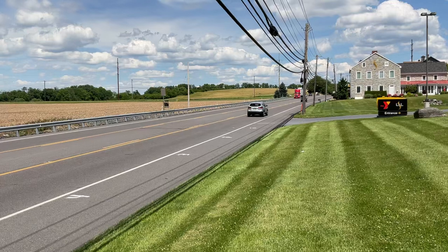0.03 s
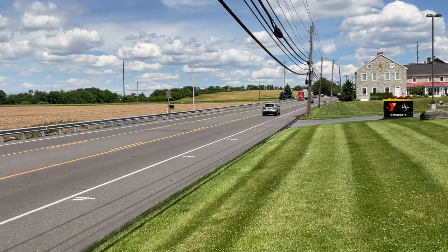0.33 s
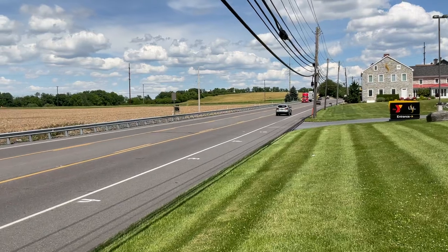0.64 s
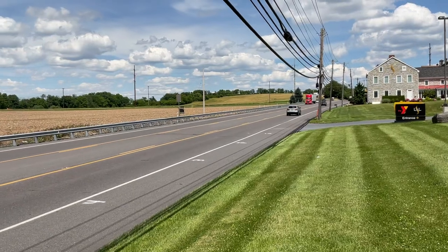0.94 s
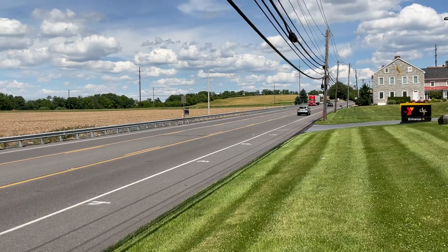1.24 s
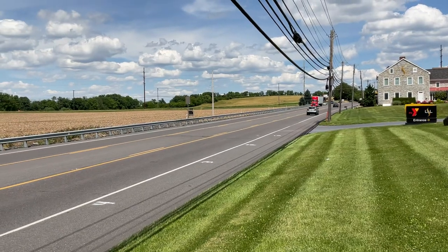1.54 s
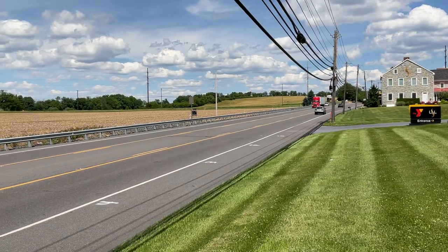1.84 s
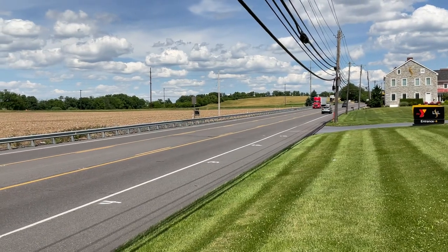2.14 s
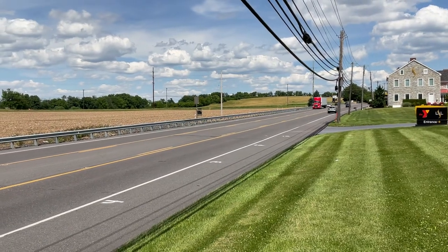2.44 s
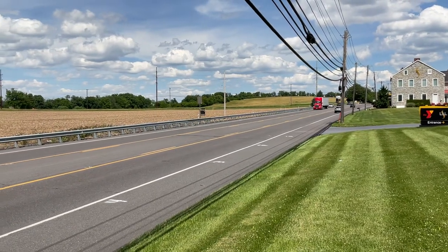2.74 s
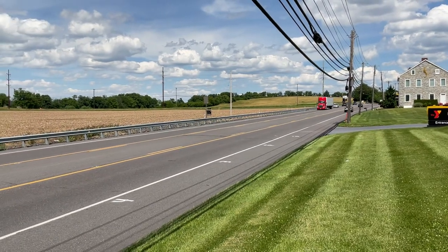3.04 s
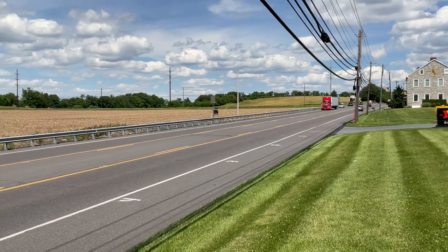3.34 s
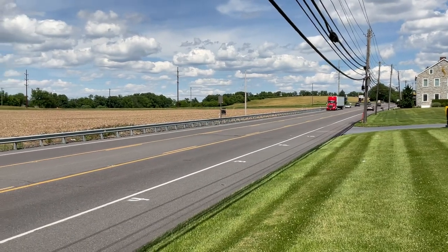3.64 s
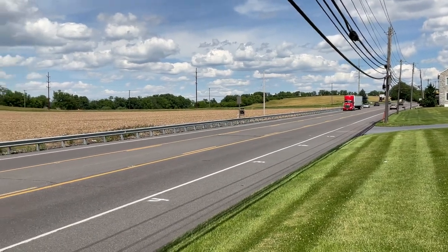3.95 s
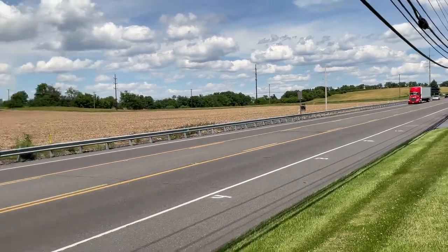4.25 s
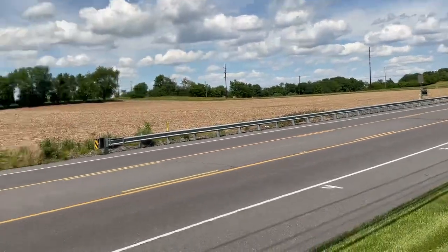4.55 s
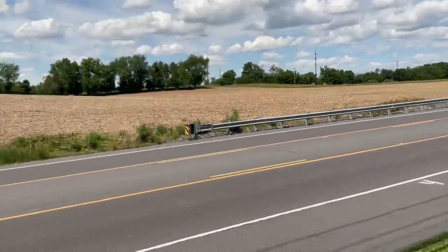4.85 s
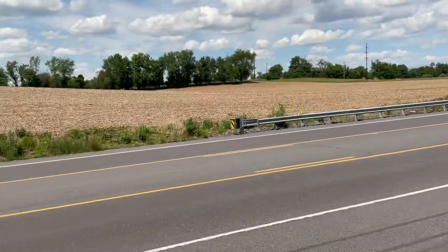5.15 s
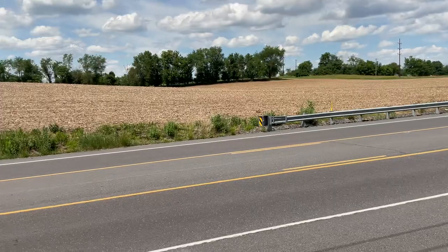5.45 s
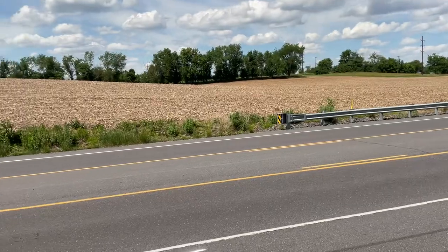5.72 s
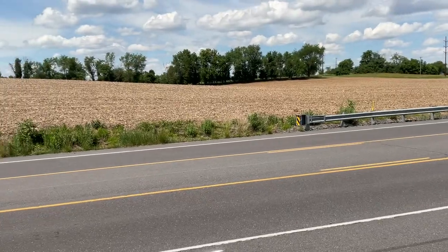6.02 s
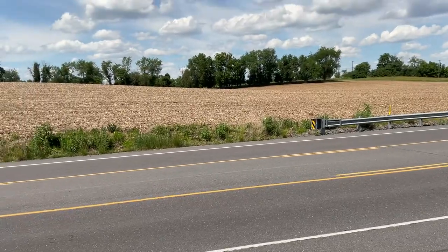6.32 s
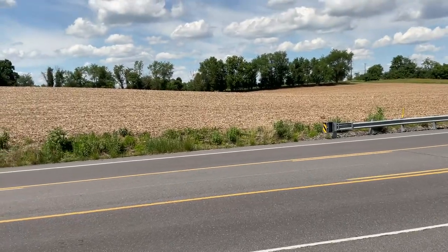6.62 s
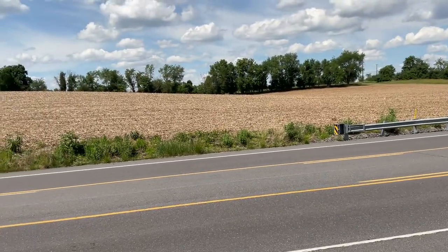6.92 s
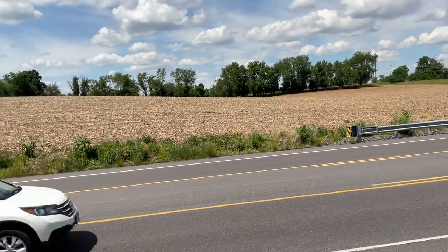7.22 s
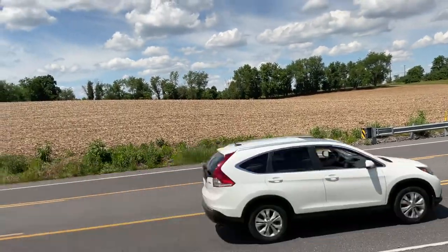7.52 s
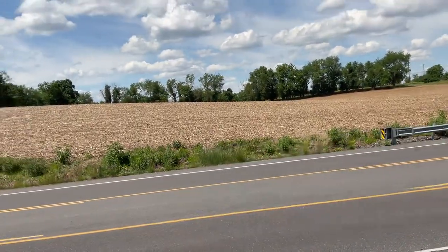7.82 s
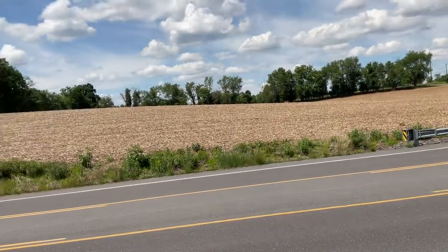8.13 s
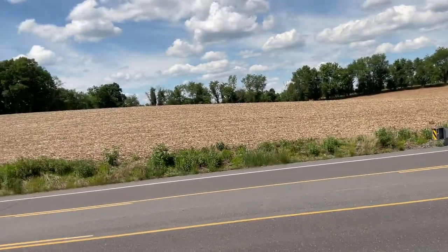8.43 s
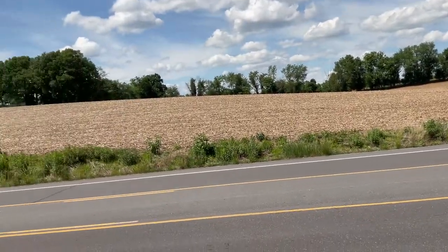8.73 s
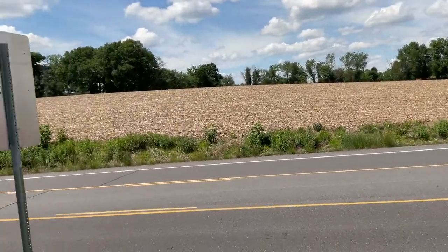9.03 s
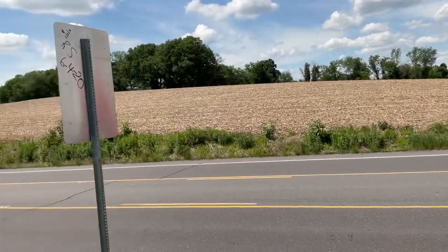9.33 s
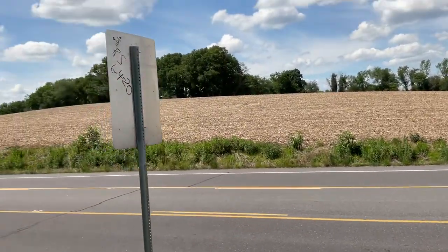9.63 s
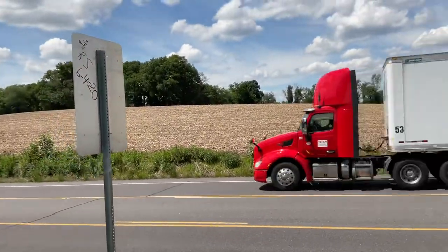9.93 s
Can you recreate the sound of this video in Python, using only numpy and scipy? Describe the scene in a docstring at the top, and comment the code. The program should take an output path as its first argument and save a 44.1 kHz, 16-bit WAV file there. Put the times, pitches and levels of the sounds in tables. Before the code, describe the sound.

A heavy truck comes up a rural road, its low diesel hum and faint turbo whistle giving way to growing tyre roar and whine. One car recedes at the start, and another rushes past close by just before the truck blares its air horn, short then long, on one note. The hand-held microphone at the roadside picks up a light wind rumble throughout and a few finger bumps and ticks midway.

```python
"""A heavy truck comes up a country road and sounds its air horn, short then long, as it draws level.
The horn is one note: a reed chopping air into a flared pipe, coloured by its echo off the road.
Under it the truck's tyres roar and whine, the diesel changes gear and the turbo whistles twice.
One car recedes and another passes close by. A light wind rumbles on the hand-held microphone,
and fingers bump and tick on its body."""
import sys
import numpy as np
from scipy import signal
from scipy.fft import rfft, irfft, next_fast_len
from scipy.io import wavfile

SR = 44100
rng = np.random.default_rng(int(sys.argv[2]) if len(sys.argv) > 2 else 0)


def materialize(psi):
    """Save the field psi as 16-bit PCM at rate SR to the path in sys.argv[1].

    A 1-D psi becomes a single channel; in a 2-D psi each row is a channel.
    """
    bounded = np.clip(np.atleast_2d(psi).T, -1, 1)
    quanta = np.round(bounded * 32767).astype(np.int16)
    wavfile.write(sys.argv[1], SR, quanta)


N = 439677
TIME = np.arange(N) / SR
FFT_SIZE = next_fast_len(N + 4096, True)
BIN_HZ = np.maximum(np.arange(FFT_SIZE // 2 + 1) * SR / FFT_SIZE, 1)


def from_db(db):
    """Decibels to gain."""
    return 10 ** (np.asarray(db) / 20)


def in_time(rows, t=TIME):
    """Read each automation lane of a table at the times t."""
    seconds, *columns = np.transpose(rows)
    return [np.interp(t, seconds, column) for column in columns]


def at_hz(rows, hz):
    """Read each column of a table along a log-frequency axis."""
    points, *columns = np.transpose(rows)
    return [np.interp(np.log(hz), np.log(points), column) for column in columns]


def bell(x, centre, width):
    """A smooth hump of height 1."""
    return np.exp(-((x - centre) / width) ** 2)


def glide(start, end, first_hz, last_hz, level_db):
    """Pitch and level of a tone that swells and fades while it slides."""
    done = np.clip((TIME - start) / (end - start), 0, 1)
    return first_hz + (last_hz - first_hz) * done, level_db + 20 * np.log10(np.sin(np.pi * done) + 1e-6)


def drift(rate_hz, t=TIME):
    """A smooth random modulator with spread 1."""
    pole = np.exp(-2 * np.pi * rate_hz / 1000)
    slow = signal.lfilter([1], [1, -2 * pole, pole * pole], rng.standard_normal(12000))[1500:]
    return np.interp(t * 1000, np.arange(len(slow)), slow / slow.std())


def fading(rate_hz, t=TIME):
    """Wandering strength and phase of many scattered paths; mean power 1."""
    return (drift(rate_hz, t) + 1j * drift(rate_hz, t)) / np.sqrt(2)


def place(mid, side, image, hz):
    """Mix two unrelated complex signals to stereo with the image's likeness, phase lead and balance."""
    alike, lead, balance_db = at_hz(image, hz)
    alike, tilt = np.clip(alike, 0, 1), from_db(balance_db / 2)
    mid, side = np.sqrt(1 + alike) * mid, np.sqrt(1 - alike) * side
    left, right = (mid + side) * tilt * np.exp(1j * lead), (mid - side) / tilt
    return np.array([left, right]) / np.sqrt(tilt ** 2 + tilt ** -2)


def roar(levels, eq, image, hiss_hz, flutter_db, low_cut_hz, grass=0, grass_hz=1100, air=0, air_hz=9500):
    """Tyre or wind noise fluttering in gusts; with distance, air can take its top and grass its body."""
    level_db, hiss_db = levels
    white = rfft(rng.standard_normal((2, FFT_SIZE))) * np.sqrt(SR / 2)
    spectrum = place(*white, image, BIN_HZ) * from_db(at_hz(eq, BIN_HZ)[0])
    spectrum /= np.sqrt(1 + (low_cut_hz / BIN_HZ) ** 8)
    high = 1 - 1 / (1 + (BIN_HZ / hiss_hz) ** 4)
    low = (1 - high) / (1 + (BIN_HZ / grass_hz) ** 8)
    highest = high / (1 + (air_hz / BIN_HZ) ** 12)
    bands = low, 1 - low - high, high - highest, highest
    body, middle, hiss, top = (irfft(spectrum * band, FFT_SIZE)[:, :N] for band in bands)
    far_db = np.minimum(hiss_db, 0)   # lost hiss stands for distance
    body = body * from_db(grass * far_db)
    hiss = hiss + top * from_db(air * far_db)
    return from_db(level_db + flutter_db * drift(3.3)) * (body + middle + hiss * from_db(hiss_db))


def hum(controls, harmonics, image, rough, width_hz):
    """Harmonics of something that turns; scattered paths smear the share `rough` of each."""
    hz, level_db = controls
    phase = 2 * np.pi * np.cumsum(hz) / SR
    out = 0
    for k, harmonic_db in harmonics:
        tone = np.sqrt(1 - rough) + np.sqrt(rough) * fading(width_hz)
        pair = place(tone, fading(width_hz), image, k * np.median(hz))
        out += from_db(harmonic_db) * (pair * np.exp(1j * k * phase)).real
    return np.sqrt(2) * from_db(level_db) * out


# The rumble's fader moves. Each row: time in seconds, level in dB, hiss gain in dB.
RUMBLE_LEVELS = [(0, -59, -12), (2.5, -60.5, 6), (4, -56.5, 13.5), (6.2, -54, 3), (7.1, -51, 16),
                 (9.97, -49, 12)]
# Its EQ. Each row: frequency in Hz, gain in dB.
RUMBLE_EQ = [(18, -34), (30, -25), (50, -3), (65, 1.5), (90, -2), (125, -0.5), (170, -10), (250, -19.5),
             (500, -41), (2000, -90)]
# Its stereo image. Each row: frequency in Hz, likeness 0-1, left lead in radians, left over right in dB.
RUMBLE_STEREO = [(40, .985, 0, -.3), (100, .98, .05, -.8), (220, .95, .1, -2)]


def wind_rumble():
    """Light wind on the microphone, blended with engine rumble into one low bed."""
    return roar(in_time(RUMBLE_LEVELS), RUMBLE_EQ, RUMBLE_STEREO,
                hiss_hz=395, flutter_db=1.37, low_cut_hz=22)


# Soft bumps. Each row: start in seconds, level in dB, ring in Hz, seconds to fall 60 dB.
FINGER_BUMPS = [(3.244, -17.5, 183, 0.044), (3.274, -18.5, 90, 0.043), (3.745, -24.5, 262, 0.025),
                (4.079, -27, 200, 0.037), (4.161, -27, 262, 0.037), (4.455, -21, 171.5, 0.026),
                (5.446, -23.5, 130, 0.13)]
# Small ticks. Each row: start in seconds, level in dB, decay in seconds.
FINGER_TICKS = [(4.1455, -37, 0.0034), (4.1517, -42, 0.0026), (4.1556, -27.5, 0.0028), (4.1625, -44, .001)]
# The ticks' EQ. Each row: frequency in Hz, gain in dB.
TICK_EQ = [(200, -7), (800, 7), (1700, 3), (3000, -14), (8500, -19.5), (11000, -32), (16000, -48)]


def handling():
    """Fingers on the microphone's body: damped low rings and tiny bursts of noise."""
    bumps, ticks = np.zeros(N), np.zeros(N)
    for start, level_db, hz, t60 in FINGER_BUMPS:
        age = TIME[:N - round(start * SR)]
        envelope = from_db(level_db - 60 * np.minimum(age / t60, 4)) * (1 - np.exp(-age / 0.0013))
        bumps[-len(age):] += envelope * np.sin(2 * np.pi * hz * age)
    for start, level_db, decay in FINGER_TICKS:
        age = TIME[:N - round(start * SR)]
        envelope = from_db(level_db) * np.exp(-np.minimum(age / decay, 20))
        ticks[-len(age):] += envelope * rng.standard_normal(len(age))
    eq = from_db(at_hz(TICK_EQ, BIN_HZ)[0])
    eq /= np.sqrt(np.mean(eq ** 2))
    return bumps + irfft(rfft(ticks, FFT_SIZE) * eq, FFT_SIZE)[:N]


def drive_by(loudest_s, half_s, level_db, fall_db, hiss_db, hiss_fall_db, hiss_lag_s):
    """A car's level and hiss fall per decade of distance; hiss is thrown backwards, so it peaks later."""
    decades = np.log10(np.hypot(1, (TIME - loudest_s) / half_s))
    hiss_decades = np.log10(np.hypot(1, (TIME - loudest_s - hiss_lag_s) / half_s))
    return level_db - fall_db * decades, hiss_db - hiss_fall_db * hiss_decades


# The receding car's EQ. Each row: frequency in Hz, gain in dB.
LEAVING_EQ = [(150, -7), (400, -13), (560, -8.5), (800, -1.5), (1150, -1), (1600, -5), (2100, -16),
              (2800, -22.5), (3800, -27.5), (6000, -38), (9000, -51.5), (14000, -93)]
# Its stereo image. Each row: frequency in Hz, likeness 0-1, left lead in radians, left over right in dB.
LEAVING_STEREO = [(120, 1, 3.5, -16), (420, 0.97, 1.67, 1.5), (730, 0.52, 3, 4.5), (1145, 1, 0.25, 0.5),
                  (1690, 0.35, -0.4, -0.5), (2600, 1, 0, 0), (7000, 0.87, 0, -2)]


def leaving_car():
    """Tyre roar of a car already past, fading and dulling as it recedes."""
    levels = drive_by(loudest_s=-2.5, half_s=0.28, level_db=-51, fall_db=15.5,
                      hiss_db=16, hiss_fall_db=11.5, hiss_lag_s=0.25)
    return roar(levels, LEAVING_EQ, LEAVING_STEREO, hiss_hz=1550, flutter_db=0.85, low_cut_hz=110)


# The close car's EQ. Each row: frequency in Hz, gain in dB.
PASSING_EQ = [(150, -16), (400, -22), (750, 0.5), (1100, 0.5), (1650, -2.5), (2100, -13), (2800, -19.5),
              (3800, -25), (6000, -26), (8700, -35), (11500, -40.5), (16000, -53)]
# Its stereo image. Each row: frequency in Hz, likeness 0-1, left lead in radians, left over right in dB.
PASSING_STEREO = [(202, 0.99, -6.5, -11), (398, 0.49, 4, 6), (680, 1, 3.5, 8), (1010, 0.27, 3.5, 14.5),
                  (1560, 1, 1.5, 4), (2290, 0.12, 3, 3.5), (3470, 0.73, -1, -3.5), (7140, 0.99, 0, 0.5)]


def passing_car(opens_s=5.73, opening_s=0.046):
    """Tyre roar of a close pass-by, muffled until the car comes into the open."""
    level_db, hiss_db = drive_by(loudest_s=7, half_s=1.13, level_db=-54.5, fall_db=42,
                                 hiss_db=2, hiss_fall_db=32, hiss_lag_s=0.88)
    muffled = 0.5 - 0.5 * np.tanh((TIME - opens_s) / opening_s)
    levels = level_db - 2 * muffled, hiss_db - 5.5 * muffled
    return roar(levels, PASSING_EQ, PASSING_STEREO, hiss_hz=3160, flutter_db=0.84, low_cut_hz=100,
                grass=0.83, grass_hz=1080, air=4.9)


TRUCK_M_PER_S, ALONGSIDE_S, LANE_M, SOUND_M_PER_S = 20, 9.85, 9, 343


def truck_distance(t=TIME):
    """Metres from the truck to the microphone."""
    return np.hypot(LANE_M, TRUCK_M_PER_S * (ALONGSIDE_S - t))


# Fader moves of the truck's tyre roar. Each row: time in seconds, level in dB, hiss gain in dB.
TRUCK_LEVELS = [(0, -110, -13), (5, -84, -3.5), (7, -64.5, -30), (8, -58.5, -2), (8.7, -62.5, 4),
                (9.15, -62.5, -2.5), (9.5, -60, -6), (9.97, -61, -5)]
# Its EQ. Each row: frequency in Hz, gain in dB.
TRUCK_EQ = [(150, 2.5), (400, -1.5), (750, 2.5), (1100, -2.5), (1600, -4), (2100, -7.5), (2800, -10),
            (3800, -14), (6000, -22.5), (9000, -30), (12000, -38.5), (16000, -51)]
# Its stereo image. Each row: frequency in Hz, likeness 0-1, left lead in radians, left over right in dB.
TRUCK_STEREO = [(198, 1, 0, 0.5), (473, 1, -1.13, -5), (734, 1, 2.5, -4.5), (1030, 0.34, 0.3, -6),
                (1550, 0.31, 0, -3.5), (2440, 0.95, -0.54, -0.5), (7000, 0.99, 0.5, -2)]


def truck_tyres():
    """The broad roar of heavy tyres, building as the truck comes up."""
    return roar(in_time(TRUCK_LEVELS), TRUCK_EQ, TRUCK_STEREO,
                hiss_hz=2520, flutter_db=0.65, low_cut_hz=90)


# The whine's pitch curve. Each row: time in seconds, tread block rate in Hz.
TREAD_PITCH = [(0, 297), (5, 297.1), (5.7, 293.5), (6.9, 283.8), (8.5, 284.7), (9.15, 280.4), (9.72, 273.2),
               (9.97, 273.4)]
# Its timbre. Each row: harmonic number, gain in dB.
TREAD_HARMONICS = [(1, -12), (2, 2.5), (3, -14), (4, -10.5)]
# Brief drones at its fundamental. Each row: start and end in seconds, first and last Hz, level in dB.
TREAD_DRONES = [(5.152, 5.78, 298, 290, -46), (6.2, 6.7, 292, 288, -44.5)]


def tread_whine():
    """Tread blocks strike the road in a whine that grows with nearness and swells once on the way."""
    metres = truck_distance()
    fall_db = 3.5 * np.log10(metres / LANE_M) + 0.27 * (metres - LANE_M)
    level_db = -23.8 - fall_db + 3 * bell(TIME, centre=6.15, width=0.36)
    hz = in_time(TREAD_PITCH)[0]
    whine = hum((hz, level_db), TREAD_HARMONICS, TRUCK_STEREO, rough=0.81, width_hz=17.1)
    return whine + sum(hum(glide(*drone), [(1, 0)], TRUCK_STEREO, rough=0.4, width_hz=4)
                       for drone in TREAD_DRONES)


# The diesel's revs. Each row: time in seconds, firing rate in Hz, level in dB.
DIESEL_REVS = [(0, 95.9, -43), (2, 99.16, -42.5), (2.6, 99.5, -38), (3.45, 99.2, -42), (3.6, 86, -39),
               (5.3, 82.7, -40.5), (5.9, 82.6, -39.5), (6.3, 80.8, -48), (9.97, 76, -62)]
# Its timbre. Each row: harmonic number, gain in dB.
DIESEL_HARMONICS = [(1, 2), (2, -12), (3, -22.5)]


def diesel_exhaust():
    """The exhaust hums at the firing rate, which drops at the gear change."""
    return hum(in_time(DIESEL_REVS), DIESEL_HARMONICS, RUMBLE_STEREO, rough=0.13, width_hz=2.8)


# Two rising whistles. Each row: start and end in seconds, first and last Hz, level in dB.
TURBO_SWELLS = [(3.419, 4.084, 1407, 1502, -44), (4.123, 4.35, 1549, 1585, -47.5)]


def turbo_whistle():
    """A thin whistle, as of a turbo spooling up."""
    return sum(hum(glide(*swell), [(1, 0)], TRUCK_STEREO, rough=0.21, width_hz=17)
               for swell in TURBO_SWELLS)


def field_echoes(dry, level_db, t60, dull_hz):
    """A thin, dull reverb tail from the guard rail, a house and trees."""
    t = TIME[:SR]
    tail = rng.standard_normal((2, SR)) * from_db(-60 * t / t60) * (t > 0.02)
    tail /= np.sqrt(np.sum(tail ** 2, axis=1, keepdims=True))
    tail = signal.sosfilt(signal.butter(1, dull_hz, fs=SR, output="sos"), tail)
    return from_db(level_db) * signal.fftconvolve(dry, tail, axes=1)[:, :N]


# The horn's wavering level. Each row: time in seconds, gain in dB at full depth.
HORN_WAVER = [(7.42, 0), (7.6, -1), (7.72, 0.5), (8, 5.5), (8.2, -4), (8.43, 0.5), (8.75, 1.5),
              (8.92, -1.5)]
# How harmonics follow waver and approach. Each row: harmonic number, waver depth, exponent of nearness.
HORN_RESPONSE = [(1, 0.84, 1.25), (1.98, 0.05, 0.35), (4.05, 0.12, 0.15), (5.05, 0.34, 0.43),
                 (7, 0.21, 1.6), (12.1, 0.58, 0.98), (23.6, 1.15, 1.32)]


def horn_path(t, hz, k, horn_height_m=4.1, mic_height_m=1.6, reference_m=30, echo_cutoff_hz=507):
    """Gain of harmonic k: it nears and wavers; the road echo cancels the fundamental at one distance."""
    metres = truck_distance(t)
    bounced_m = np.hypot(metres, horn_height_m + mic_height_m)
    direct_m = np.hypot(metres, horn_height_m - mic_height_m)
    reflection = 0.99 / (1 + (k * hz / echo_cutoff_hz) ** 8)
    echo = reflection * np.exp(-2j * np.pi * k * hz * (bounced_m - direct_m) / SOUND_M_PER_S)
    waver_depth, nearness = at_hz(HORN_RESPONSE, k)
    waver_db = waver_depth * in_time(HORN_WAVER, t)[0]
    # the upper mids blare late in the long blast
    blare_db = 7.5 * bell(t, centre=8.8, width=0.14) * bell(np.log2(k * hz / 1730), centre=0, width=0.26)
    return (1 + echo) * (reference_m / metres) ** nearness * from_db(waver_db + blare_db)


# The horn's timbre. Each row: harmonic number, level in dB.
HORN_HARMONICS = [(1, -19), (2, -24.5), (3, -27.5), (4, -29.5), (5, -23.5), (6, -31), (7, -26.5), (8, -29),
                  (10, -32.5), (12, -36.5), (15, -36.5), (19, -43), (23, -41.5), (33, -51.5), (40, -60),
                  (52, -71.5)]
# Its stereo image. Each row: frequency in Hz, likeness 0-1, left lead in radians, left over right in dB.
HORN_STEREO = [(300, 0.95, -0.6, -1), (583, 1, -0.68, -1.5), (890, 0.56, 0.98, -0.5),
               (1150, 0.87, -0.32, -3.5), (1470, 1, -0.12, -14), (1740, 0.9, -0.18, 0),
               (2500, 0.95, -0.32, 1), (4750, 1, -0.18, -5), (7000, 0.72, 0.44, -4), (9100, 1, 0.22, 0)]
# The short and the long blast. Each row: valve opening and closing in seconds, gain in dB.
HORN_BLASTS = [(7.36, 7.74, 0.5), (7.91, 8.94, 1.42)]
REED_HZ, START_SHARP_HZ, SETTLE_S, SAG_HZ_PER_S, RELEASE_HZ_PER_S = 280.1, 4.58, 0.044, 1.7, 100
ATTACK_S, DRAIN_DB_PER_OCTAVE_S, STALL_S = 0.015, 64, 0.053


def air_horn(opens, closes, blast_db, darkening=0.57, jitter_hz=0.4, rasp=0.1, rasp_hz=84,
             scatter_low=0.0092, scatter_high=0.99, kinship=0.49, fade_hz=9.9):
    """A reed chops air into a flared pipe: the harder it is blown, the further up its harmonics reach."""
    sounding = (TIME > opens) & (TIME < closes + 4 * STALL_S)
    t, out = TIME[sounding], np.zeros((2, N))
    age, shut_s = t - opens, np.maximum(t - closes, 0)
    # the reed starts sharp, settles, sags as the tank empties and goes sharp once the valve closes
    reed_hz = REED_HZ + START_SHARP_HZ * np.exp(-age / SETTLE_S) - SAG_HZ_PER_S * age
    reed_hz += RELEASE_HZ_PER_S * shut_s
    hz = reed_hz / (1 + np.gradient(truck_distance(t), t) / SOUND_M_PER_S)   # Doppler shift
    phase = 2 * np.pi * np.cumsum(hz + jitter_hz * drift(25, t)) / SR
    # the tone builds from the bottom up; on release the overtones drain first, then the reed stalls
    pressure_db = 20 * np.log10(1 - np.exp(-age / ATTACK_S) + 1e-6) - (shut_s / STALL_S) ** 3
    tilt_db_per_octave = darkening * pressure_db - DRAIN_DB_PER_OCTAVE_S * shut_s
    scattered = fading(fade_hz, t)
    for k in range(1, 54):
        level_db = at_hz(HORN_HARMONICS, k)[0] + blast_db + pressure_db + tilt_db_per_octave * np.log2(k)
        # moving air and the road scatter short waves most; kinship makes neighbours fade together
        scatter = scatter_low + (scatter_high - scatter_low) * (k - 1) ** 2 / (k ** 2 + 55)
        scattered = kinship * scattered + np.sqrt(1 - kinship ** 2) * fading(fade_hz, t)
        tone = np.sqrt(1 - scatter) + np.sqrt(scatter) * scattered
        tone += rasp * np.sqrt(k) * fading(rasp_hz, t)
        pair = place(tone, fading(fade_hz, t), HORN_STEREO, k * np.median(hz)) * horn_path(t, hz, k)
        carrier = np.exp(1j * (k * phase + rng.uniform(0, 2 * np.pi)))
        out[:, sounding] += np.sqrt(2) * from_db(level_db) * (pair * carrier).real
    return out


def scene():
    """The roadside mix: cars, truck and horn over wind and handling noise."""
    cars = leaving_car() + passing_car()
    truck = truck_tyres() + tread_whine() + diesel_exhaust() + turbo_whistle()
    horn = sum(air_horn(*blast) for blast in HORN_BLASTS)
    wind = wind_rumble()
    echoes = field_echoes(horn, level_db=-26, t60=0.15, dull_hz=2500)
    return wind + handling() + cars + truck + echoes + horn


# Phase turn of the microphone's left port cavity. Each row: frequency in Hz, phase in radians.
LEFT_PORT_PHASE = [(1400, 0), (1900, -1.2), (2250, -2.1), (2700, -np.pi), (3300, -4.8), (3900, -2 * np.pi)]


def record(dry, silent_until_s=0.036, ceiling=1.2, cutoff_hz=15750):
    """A brief silence first; the left port turns the upper mids' phase; peaks round, the top is cut."""
    port = np.exp(1j * at_hz(LEFT_PORT_PHASE, BIN_HZ)[0])
    left = irfft(rfft(dry[0], FFT_SIZE) * port, FFT_SIZE)[:N]
    rounded = ceiling * np.tanh(np.array([left, dry[1]]) / ceiling)
    high_cut = signal.ellip(10, 0.1, 80, cutoff_hz, fs=SR, output="sos")
    return signal.sosfilt(high_cut, rounded * (TIME > silent_until_s))


dry = scene()
out = record(dry)
materialize(out)
```